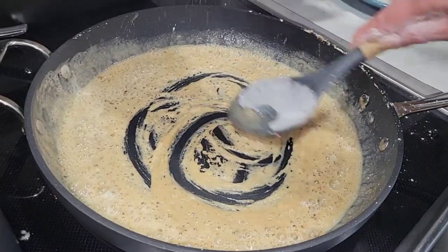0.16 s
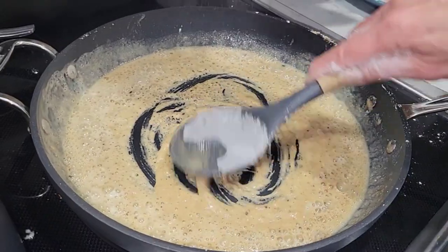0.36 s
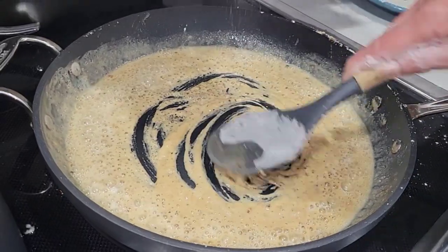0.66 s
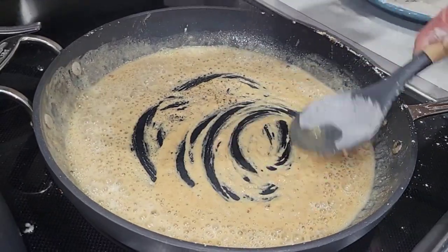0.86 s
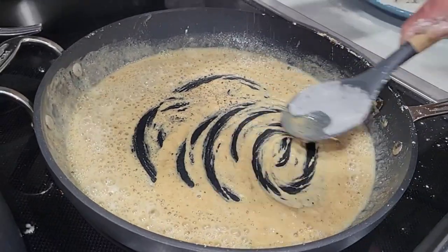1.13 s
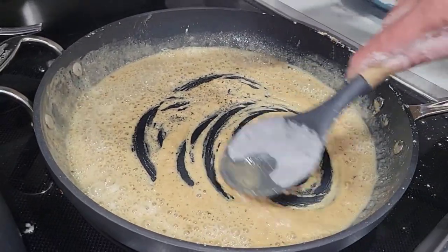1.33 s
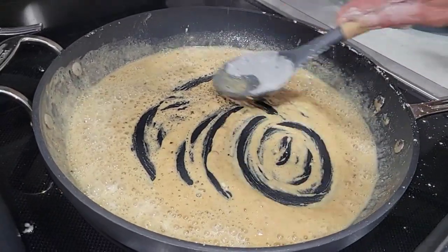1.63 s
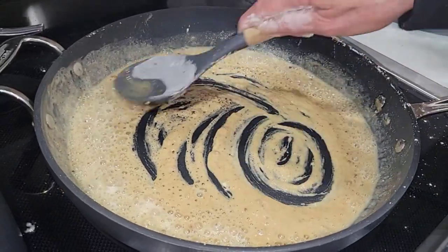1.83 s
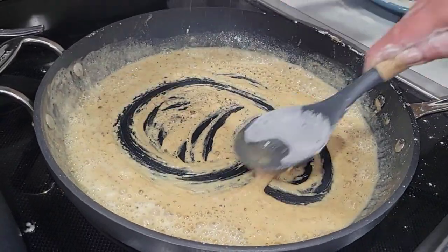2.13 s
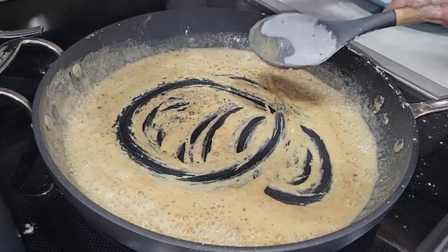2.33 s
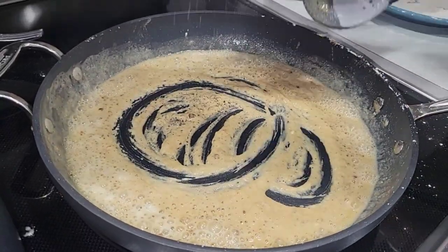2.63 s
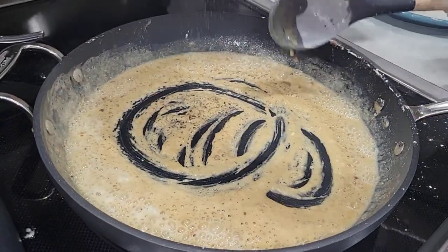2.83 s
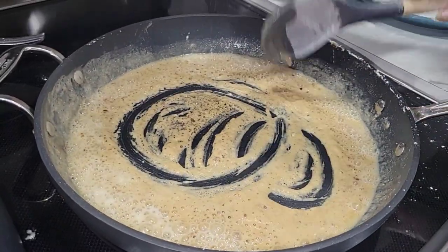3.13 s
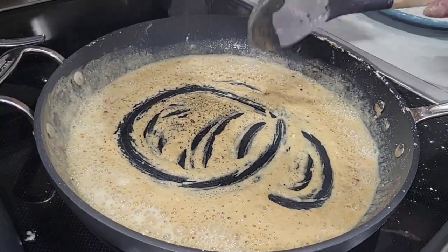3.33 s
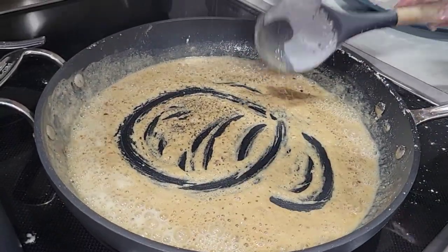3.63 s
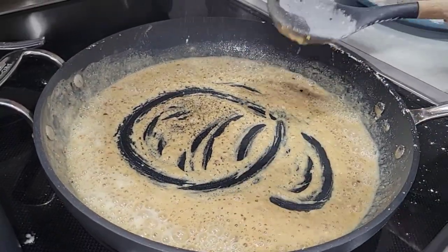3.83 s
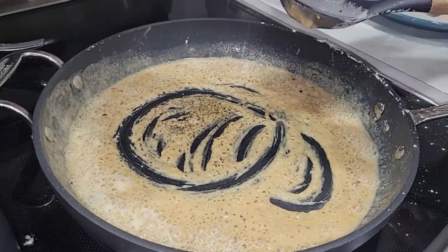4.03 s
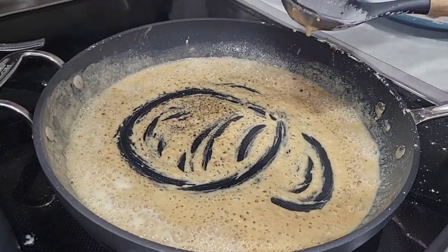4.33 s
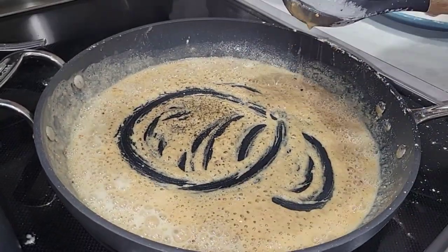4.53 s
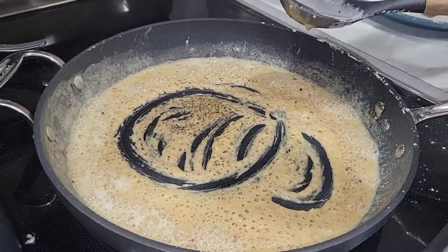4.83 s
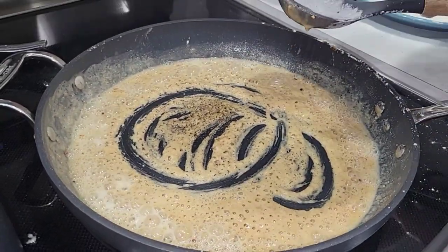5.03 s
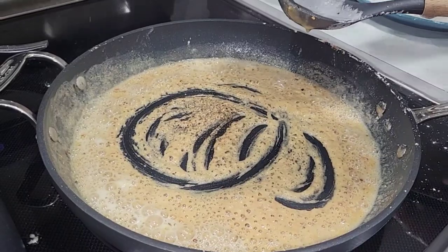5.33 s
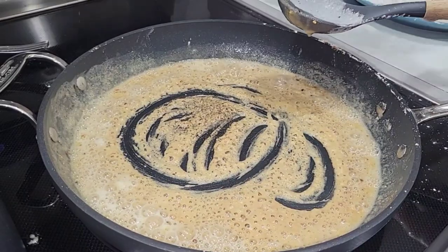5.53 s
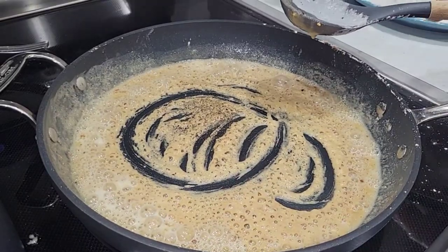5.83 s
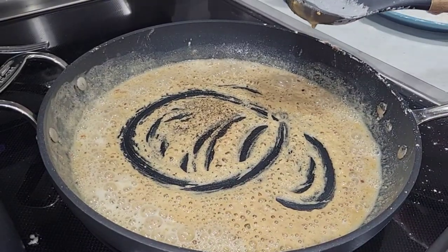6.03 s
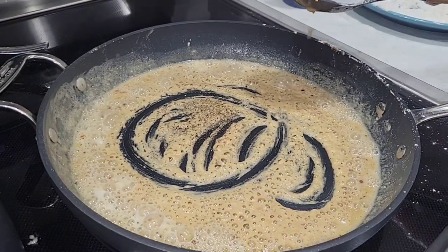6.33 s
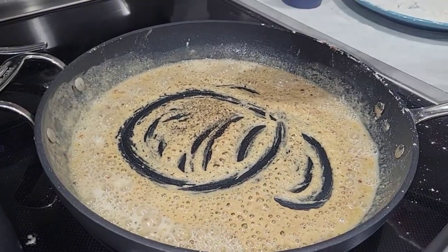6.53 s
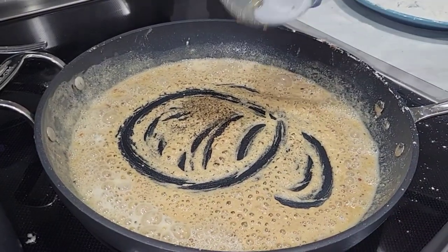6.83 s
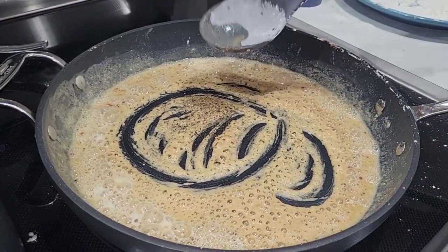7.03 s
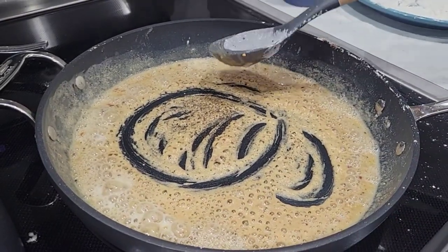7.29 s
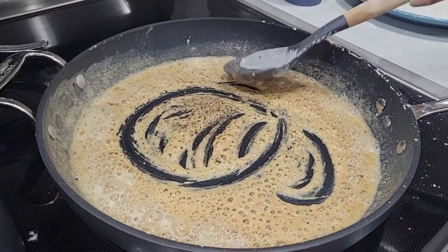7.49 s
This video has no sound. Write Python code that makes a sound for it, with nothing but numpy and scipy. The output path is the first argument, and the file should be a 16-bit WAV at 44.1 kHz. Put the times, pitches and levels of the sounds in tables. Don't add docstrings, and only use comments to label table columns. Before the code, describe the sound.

Close up in a small hard kitchen, a pepper mill grinds in short crunchy strokes about twice a second, corns snapping brightly with faint scraping whispers between. A pan of sauce hisses softly, with dull plops and stirring early on. After about five seconds the grinding stops, leaving low fan hum, fainter simmer and a few small knocks on the counter.

```python
import sys
import numpy as np
from scipy import signal
from scipy.fft import rfft, irfft, next_fast_len
from scipy.io import wavfile
from scipy.ndimage import uniform_filter1d

SR = 44100
rng = np.random.default_rng(int(sys.argv[2]) if len(sys.argv) > 2 else 0)


def natural_amplitude(level_db):
    exponent = np.asarray(level_db, float) / 20
    return 10 ** exponent


def master_out(mix):
    frames = np.transpose(np.atleast_2d(mix))
    ceiling = np.clip(frames, -1, 1)
    pcm = np.round(ceiling * 32767).astype(np.int16)
    wavfile.write(sys.argv[1], SR, pcm)


N = 337666

# frequency in Hz, density in dB per Hz.
AIR_SPECTRUM = [(15, -29), (25, -0.5), (54, -7.5), (101, -8), (118, -20), (209, -15), (241, -12),
                (374, -12.5), (447, -24), (638, -15.5), (726, -23.5), (788, -20.5), (1200, -28),
                (1560, -44), (2640, -120)]
AIR_DB = -62
# frequency in Hz, level in dB, wander in Hz.
FAN_TONES = [
    (47, -61, 0.19),
    (98, -70.5, 0.48),
    (133, -76.5, 0.33),
    (194, -81, 0.9),
]
MAINS_HZ, MAINS_DB, MAINS_OFF_S = 120.3, -63, 5.38
# frequency in Hz, likeness from -1 to 1.
CORRELATION = [(60, 0.52), (180, 0.87), (550, -0.072), (1650, -0.42), (4970, 0.095), (15000, -0.055)]

# time in seconds, hiss level in dB.
SIMMER_VIGOUR = [(0.0, -49), (0.55, -49.5), (1.53, -55), (2.05, -49), (2.13, -55.5), (6.97, -62.5),
                 (7.66, -61.5)]
# frequency in Hz, density in dB per Hz.
HISS_SPECTRUM = [(2350, -24), (4000, -10), (4410, -17), (5360, -2), (5810, -4), (6520, -3.5), (7570, -6.5),
                 (9920, -5), (11300, -10.5), (12800, -3.5), (15800, -9)]
# frequency in Hz, density in dB per Hz.
RUSTLE_SPECTRUM = [(530, -17.5), (900, -8.5), (1350, -2), (1850, -1.5), (2200, -2), (2920, -6), (4500, -7),
                   (5850, -42), (9900, -120)]
RUSTLE_DB, RUSTLE_FOLLOWS = -62, 1.05
PAN_MODES_HZ = (310, 1113)
STIR_DB, STIR_END_S = -61.5, 3.5
# time in seconds, peak in dB, bubble resonance in Hz.
PLOPS = [(0.079, -54, 650), (0.115, -50, 577), (0.181, -55, 630), (0.257, -45, 695), (0.262, -47, 290),
         (0.543, -49.5, 546), (0.588, -51, 610), (0.636, -47, 665), (0.691, -51, 520), (0.719, -52, 620),
         (0.751, -51.5, 640), (1.067, -48.5, 674), (1.42, -55, 650), (1.613, -51, 600), (1.628, -52, 368),
         (2.167, -46, 656), (2.206, -48.5, 590)]

# start in seconds, peak in dB, ring in Hz, t60 in seconds.
KNOCKS = [(5.229, -55, 297, 0.11), (5.23, -55, 770, .095), (5.36, -46, 1220, 0.036),
          (5.361, -43, 2910, 0.04), (5.372, -53, 330, 0.05), (5.477, -51, 2000, 0.2),
          (5.88, -54.5, 615, 0.19), (6.233, -49, 750, .076), (6.258, -38.5, 490, 0.063),
          (6.258, -46, 850, 0.1), (6.259, -41, 3750, 0.13), (6.411, -58, 1300, 0.055),
          (7.529, -50, 1670, .04), (6.309, -57, 306, 0.11), (6.737, -52, 310, 0.07),
          (6.738, -57, 900, 0.15), (6.94, -45, 545, 0.12), (6.942, -53, 2370, 0.16),
          (6.935, -50.5, 3300, 0.052), (6.94, -50, 1360, 0.24), (7.596, -55, 400, 0.08),
          (7.596, -57, 1670, .08), (7.596, -55, 900, .11)]
# start in seconds, peak in dB, ring in Hz,
# t60 in seconds.
BUMPS = [(2.373, -48, 450, 0.044), (2.412, -48, 350, .05), (2.437, -44, 646, .05), (2.96, -51, 260, 0.049),
         (3.386, -45, 403, 0.054), (3.94, -54, 347, 0.036), (4.392, -45, 500, 0.047),
         (4.435, -48, 547, .06)]
KNOCK_WIDTH = 10.5
# start in seconds, peak in dB.
THUDS = [
    (6.258, -42.5),
    (6.312, -53),
    (6.74, -62),
]
# frequency in Hz, level in dB, t60 in seconds.
SLAB_MODES = [(81, 4.5, 0.35), (121, 8, 0.13), (212, 8, 0.22), (263, 10, 0.05), (300, -22, 0.12),
              (616, -20, 0.042), (750, 1, 0.11)]

# middle in seconds, length in
# seconds, frequency in Hz, bandwidth in Hz, level in dB.
SQUEAKS = [(1.448, 0.072, 13000, 700, -51), (5.204, 0.0059, 12600, 2100, -26),
           (5.466, 0.014, 12000, 300, -55), (5.49, 0.05, 12600, 250, -55), (5.503, 0.14, 8300, 790, -59),
           (5.62, 0.17, 8400, 500, -63), (5.709, 0.0091, 13500, 3000, -54),
           (5.365, 0.013, 10000, 6700, -51), (1.388, 0.007, 11000, 6000, -43)]
SQUEAK_PAN_DB = 2.5
# middle in seconds, length in seconds,
# level in dB, favoured band in Hz.
BACK_TURNS = [(0.707, .14, -53, 6550), (1.08, 0.15, -50, 8700), (1.438, 0.16, -51.5, 6900),
              (1.64, 0.25, -59, 6000), (2.167, 0.21, -48.5, 4100), (2.687, 0.11, -50.5, 5700),
              (3.205, .22, -54, 5530), (3.667, 0.2, -52.5, 3200), (4.16, .24, -54, 5570),
              (4.69, 0.23, -53, 5700), (6.532, 0.25, -65, 3500), (6.995, 1, -63.5, 1600),
              (7.287, 0.13, -68, 2300)]
# frequency in Hz, density in dB per Hz.
SLIDE_SPECTRUM = [(700, -47), (1300, 1.5), (2300, 8), (4000, 0), (6000, 1.5), (9000, 4), (13000, 2.5),
                  (16000, 3)]

GRIPS = [0, .3465, .385, .801, .818, .869, 1.251, 1.8158, 1.86, 2.3495, 2.4112, 2.5, 2.88, 2.921, 3.372,
         3.417, 3.8478, 3.9042, 4.3608, 4.404, 4.858, 4.866]
# hold in seconds, level in dB, treble against body in dB.
TWISTS = [(0.0032, -41.5, 0), (0.028, -39.5, 1), (0.1, -35, -3), (.016, -44, 5), (0.028, -33, -0.5),
          (0.054, -34, -3), (0.012, -41, -10), (0.022, -34.5, -2), (.11, -39, -1.5), (.042, -38.5, -3),
          (0.065, -36.5, 0), (0.039, -38.5, -10), (0.043, -46, 1.5), (0.12, -39, -0.5), (0.045, -35.5, 1.5),
          (0.085, -35.5, 1.5), (0.042, -37, -6), (0.056, -36.5, -3), (0.051, -35, -6), (0.053, -38, -3),
          (.006, -44, -1), (0.05, -36, 5)]
RELEASE_DB_PER_S = 600
CRUMB_RINGS_HZ = (2200, 2650, 2800, 3200, 3730)
CRUMB_GAP_S, CRUMB_DECAY_S = .006, .0038
CRUMB_DB, CRUMB_SPREAD_DB = 3, 2

# time in seconds, level in dB, body ring in Hz, length in ms, treble in dB.
CRACKS = [(0.3474, -20.5, 1510, 2.3, -3), (0.432, -18, 3240, 4.9, 2.5), (0.439, -16.5, 3060, 2.4, 7),
          (0.4575, -21, 3600, 6.5, 2), (0.464, -18, 1900, 11, -3), (0.4918, -21, 2100, 6, 8),
          (0.8173, -22, 2600, 7.3, 10), (.869, -19, 2750, 9.5, 4), (0.9163, -21, 2700, 5.9, 1.5),
          (4.3602, -32, 3420, 3.7, 0), (1.8164, -15, 3560, 3.7, 11), (1.8604, -18.5, 4070, 4, 9),
          (1.898, -18, 1450, 2.4, 9.5), (1.927, -16.5, 1540, 2.6, -4), (2.372, -15.5, 3800, 3.1, -5),
          (2.4117, -17, 2110, 4, 1), (2.439, -21, 2700, 2.6, -6), (2.509, -19, 2820, 4.9, -1),
          (2.9477, -17, 2800, 3.3, 15), (3.0357, -22, 2750, 3.6, 5), (3.381, -22, 3100, 2.3, 1),
          (3.437, -20, 2940, 12, 7), (3.461, -17.5, 3020, 2.6, 12), (3.47, -17, 4000, 3.2, 9),
          (3.9044, -22, 3360, 4.5, -1), (3.9402, -15.5, 1700, 4, 5.5), (4.3912, -13.5, 1810, 3.4, 9.5),
          (0.508, -30, 3190, 2.7, 3), (1.928, -24, 2800, 16, -0.5), (4.8948, -21, 3200, 4.5, 0)]
# time in seconds, level in dB, body ring in Hz, treble in dB.
CHIPS = [(0.3554, -25, 3120, 4.5), (0.3945, -29.5, 3380, 8), (0.409, -25, 2200, 2),
         (0.4273, -23.5, 3320, 5.5), (0.476, -25, 3620, 5), (0.8411, -26, 2590, -1),
         (0.8855, -25.5, 2000, 10), (1.8225, -24, 2970, -1), (1.8305, -25, 3500, 5),
         (1.8417, -20.5, 2820, 10), (1.8791, -26.5, 2950, 1), (2.3494, -35, 2800, -7),
         (2.385, -26, 1700, 0), (2.432, -22, 2700, -1), (2.45, -24.5, 2650, -11), (2.4999, -23, 2650, 3),
         (2.521, -27, 2490, 4), (2.9566, -24.5, 2800, 8), (2.9782, -29.5, 3200, 2),
         (3.0213, -31.5, 2800, 4.5), (3.3854, -24.5, 1460, -2), (3.3981, -27.5, 1510, 4),
         (3.4192, -28, 2800, 8), (3.493, -24, 3200, 1), (3.8475, -26, 2270, 1.5), (3.9256, -26, 3200, -8),
         (4.3727, -27, 4100, -2), (4.8755, -23.5, 2350, 3), (4.888, -22, 2000, 0), (4.9068, -21.5, 4400, 0),
         (3.937, -24, 2000, 2)]
# time in seconds, level in dB, body ring in Hz, treble in dB.
CRUMBS = [(0.3881, -35, 2760, 19), (0.4237, -24, 3250, -2), (0.5292, -33, 2050, -19),
          (0.8327, -27, 2650, -7), (0.8485, -24, 2500, 1), (0.888, -25, 3500, 10), (0.8965, -29, 2800, -6),
          (0.9464, -36, 2860, 3), (1.263, -35, 2150, -8), (1.9126, -30, 2800, 6), (1.9443, -30, 3190, -12),
          (1.955, -34.5, 1580, -21), (1.9827, -34, 2800, -18), (2.365, -34, 2800, 2),
          (2.421, -24, 3120, -2), (2.4744, -31, 3230, 4), (2.492, -38, 3170, -2), (2.554, -38.5, 2820, -22),
          (2.8793, -35, 4200, 6), (2.896, -33, 3190, -9), (2.9044, -30, 2920, -4), (2.921, -32, 3180, -6),
          (2.9266, -29.5, 3000, -13), (2.934, -36, 3120, -6), (2.9407, -29, 2800, 15),
          (2.9752, -27, 2900, 4), (2.9893, -27, 3320, 3), (3.014, -33, 2840, -11), (3.0277, -29, 3100, -6),
          (3.0303, -31, 2060, 3), (3.0564, -36.5, 2400, 0), (3.3707, -33, 2970, -2),
          (3.4045, -26, 2200, -10), (3.4895, -27, 2800, 11), (3.498, -22.5, 3000, 8),
          (3.5042, -31, 2800, -14), (3.8584, -27.5, 2800, 9), (3.8793, -33, 3320, -14),
          (3.8835, -29, 2700, -8), (3.893, -24.5, 2730, 3), (3.9806, -33.5, 1820, -5),
          (3.9887, -37, 2760, -6), (4.367, -29, 3570, -10), (4.3832, -29, 3140, 2), (4.388, -29, 2300, 10),
          (4.4078, -32, 2370, -6), (4.411, -29, 2350, 18), (4.4232, -36, 2780, 8), (4.4653, -35, 1790, 9),
          (4.4697, -29, 2330, -9)]
CHIP_MS, CRUMB_MS = 5.5, 2
# time in seconds, level
# in dB, ring in Hz, treble in dB, length in ms.
TICKS = [(0.322, -41.5, 2800, 2, 29), (0.721, -37.5, 1960, 25, 4), (1.035, -39, 2400, 5, 3.4),
         (4.8661, -12, 3730, 2, 3), (1.3866, -50, 2000, -3, 18), (1.797, -41, 2170, 1, 9.9),
         (2.0475, -42.5, 3870, -9, 8.6), (3.264, -49, 4000, 15, 16), (3.526, -29, 2870, 12, 4),
         (3.7898, -53, 2000, -7, 5), (4.4842, -34, 3330, -14, 3.2), (5.1133, -45, 3860, -1, 4.1),
         (5.203, -38, 3960, 32, .8), (6.261, -48, 3850, -4, 12), (4.8664, -15, 6300, -12, 4),
         (6.459, -55, 2450, 15, 70), (6.899, -57, 1900, -4, 14), (6.932, -49.5, 1800, -4, 9),
         (7.37, -56.5, 2200, 2, 6), (7.513, -49, 4430, 9, 5.5), (1.416, -50, 2900, -10, 13),
         (1.185, -51, 2000, -3, 4.5), (.7763, -46.5, 2870, 3, 6), (7.527, -44.5, 2860, 11, 5.9)]
# time in seconds, level in dB,
# body ring in Hz, length in ms.
JOLTS = [(1.2512, -25, 2200, 3), (1.2514, -26, 1570, 3.4), (1.2535, -34, 4000, 14),
         (3.8672, -28, 2480, 6.6), (3.958, -27, 2570, 2.4), (4.4327, -23, 1780, 1.7),
         (4.4395, -24.5, 1730, 6), (4.4496, -27, 1850, 3.5), (4.9145, -26, 2240, 7), (.0015, -38, 3330, 11)]
JOLT_TREBLE_DB = -14
SPLIT_DB = 21.5
BASS_CUT = 0.4
LOW_RING_DB_PER_OCTAVE = 6
TURN_LAG = 10

# frequency in Hz, bandwidth in Hz, level in dB.
MILL_MODES = [(1540, 140, -10.5), (2000, 3300, -5), (2700, 230, -4), (6110, 230, -14.5)]
# frequency in Hz, density in dB per Hz.
MILL_SPECTRUM = [(150, -37), (300, -13.5), (600, -10), (900, -20.5), (1150, -11), (1400, -6.5), (2000, -8),
                 (2800, -9), (4000, -5.5), (5200, -11), (6300, -7), (8000, -8.5), (12500, -9), (16000, -10)]
# time in seconds, left minus right in dB.
SWAY = [(0, -.5), (.7, 0), (1.1, 1.5), (1.6, 2), (2.2, -1.3), (2.7, -1.7), (3.2, -1.1), (3.7, -.2),
        (4.2, 1), (4.7, -2.9), (5.05, 4)]
ROOM_T60_S, ROOM_DB = 0.42, -15.8


def unit(x):
    return x / np.sqrt(np.mean(x ** 2) + 1e-20)


def at_hz(points, hz):
    points_hz, values = np.transpose(points)
    return np.interp(np.log(hz + 1e-3), np.log(points_hz + 1e-3), values)


def colour(x, points):
    size = 4096
    cepstrum = irfft(np.log(natural_amplitude(at_hz(points, np.fft.rfftfreq(size, 1 / SR)))))
    cepstrum[1:size // 2] *= 2
    cepstrum[size // 2 + 1:] = 0
    response = irfft(np.exp(rfft(cepstrum))) + np.zeros(x.shape[:-1] + (1,))
    return signal.fftconvolve(x, response, axes=-1)[..., :N]


def resonance(x, hz, width_hz):
    r = np.exp(-np.pi * width_hz / SR)
    poles = [1, -2 * r * np.cos(2 * np.pi * hz / SR), r * r]
    return signal.lfilter([(1 - r * r) / 2, 0, (r * r - 1) / 2], poles, x)


def butter(x, order, hz, kind):
    return signal.sosfilt(signal.butter(order, hz, kind, fs=SR, output="sos"), x)


def split(x):
    return butter(x, 2, 5000, "low"), butter(x, 3, 5000, "high")


def drift(rate):
    count = int(N / SR * rate) + 2
    return np.interp(np.linspace(0, count - 1, N), np.arange(count), rng.standard_normal(count))


def add(track, piece, s):
    i = max(int(s * SR), 0)
    track[..., i:i + piece.shape[-1]] += piece[..., :N - i]


def stereo_noise(points, patchy_db):
    size = next_fast_len(N)
    mid, side = rfft(colour(rng.standard_normal((2, N)), points), size)
    alike = np.clip(at_hz(CORRELATION, np.fft.rfftfreq(size, 1 / SR)), -1, 1)
    pair = np.sqrt(1 + alike) * mid + np.sqrt(1 - alike) * side * [[1], [-1]]
    return unit(irfft(pair, size)[:, :N]) * natural_amplitude(patchy_db * drift(25))


def drone():
    t = np.arange(N) / SR
    tones = np.zeros(N)
    for hz, db, wander_hz in FAN_TONES:
        phase = 2 * np.pi * np.cumsum(hz + wander_hz * drift(4.7)) / SR
        tones += natural_amplitude(db + 0.5 + 0.23 * drift(5.1)) * np.sin(phase)
    mains_on = np.clip((MAINS_OFF_S - t) / 0.027, 0, 1)
    tones += natural_amplitude(MAINS_DB + 2) * np.sin(2 * np.pi * MAINS_HZ * t) * mains_on
    air = butter(stereo_noise(AIR_SPECTRUM, patchy_db=.8), 3, 42, "high")
    return tones * natural_amplitude([[-.3], [.3]]) + natural_amplitude(AIR_DB) * air


def simmer():
    vigour_db = np.interp(np.arange(N) / SR, *np.transpose(SIMMER_VIGOUR))
    rustle_db = RUSTLE_DB + RUSTLE_FOLLOWS * (vigour_db - vigour_db.mean())
    hiss = natural_amplitude(vigour_db) * stereo_noise(HISS_SPECTRUM, patchy_db=.9)
    return hiss + natural_amplitude(rustle_db) * stereo_noise(RUSTLE_SPECTRUM, patchy_db=.8)


def stirring():
    drag = rng.standard_normal((2, N)) * natural_amplitude(4 * drift(18))
    murmur = unit(resonance(resonance(drag, 674, 200), 620, 300))
    murmur = murmur + 0.55 * unit(resonance(drag, PAN_MODES_HZ[0], 100))
    return natural_amplitude(STIR_DB) * murmur * np.clip(1 - np.arange(N) / SR / STIR_END_S, 0, 1)


def plops():
    out, t = np.zeros(N), np.arange(6000) / SR
    for s, peak_db, hz in PLOPS:
        push = rng.standard_normal(len(t)) * np.exp(-t / 0.009) * np.minimum(t / 0.0017, 1)
        squelch = unit(resonance(resonance(push, hz, 60), hz, 200))
        for pan_hz in PAN_MODES_HZ:
            answer = unit(resonance(resonance(push, pan_hz, 120), pan_hz, 300))
            squelch = squelch + natural_amplitude(-8.5 + 2 * rng.standard_normal()) * answer
        add(out, natural_amplitude(peak_db + 4.0) * squelch / np.abs(squelch).max(), s - .003)
    return out


def knocks():
    out, t = np.zeros(N), np.arange(6000) / SR
    for s, peak_db, hz, t60 in KNOCKS + BUMPS:
        rattle = rng.standard_normal(len(t)) * natural_amplitude(-60 * t / t60)
        knock = resonance(rattle, hz, min(KNOCK_WIDTH * np.sqrt(hz), 400))
        knock = resonance(knock, hz, min(hz, 1100))
        add(out, natural_amplitude(peak_db) * knock / np.abs(knock).max(), s)
    return out


def thuds():
    out, t = np.zeros(N), np.arange(int(.4 * SR)) / SR
    for s, peak_db in THUDS:
        for hz, db, t60 in SLAB_MODES:
            decay = natural_amplitude(peak_db + db - 5 - 60 * t / t60)
            add(out, decay * np.sin(2 * np.pi * hz * t) * np.minimum(t / 0.0032, 1), s)
    return out


def squeaks():
    out = np.zeros((2, N))
    for s, length_s, hz, width_hz, level_db in SQUEAKS:
        rub = resonance(rng.standard_normal((2, 6000)), hz, width_hz)[:, :int(length_s * SR)]
        rub = rub * natural_amplitude([[SQUEAK_PAN_DB], [-SQUEAK_PAN_DB]])
        add(out, natural_amplitude(level_db) * unit(rub) * np.hanning(rub.shape[1]), s - length_s / 2)
    return out


def back_turns():
    out, t = np.zeros((2, N)), np.arange(N) / SR
    slide = stereo_noise(SLIDE_SPECTRUM, patchy_db=1.6)
    for s, length_s, level_db, hz in BACK_TURNS:
        now = np.abs(t - s) < length_s / 2
        rub = slide[:, now] + natural_amplitude(4.5) * resonance(slide[:, now], hz, .2 * hz)
        out[:, now] += natural_amplitude(level_db) * unit(rub) * np.cos(np.pi * (t[now] - s) / length_s)
    return out


def twisting():
    gain, treble_gain = np.zeros(N + SR), np.zeros(N + SR)
    for start, (hold_s, level_db, treble_db) in zip(GRIPS, TWISTS):
        t = np.arange(int((hold_s + .2) * SR)) / SR
        first = int(start * SR)
        now = slice(first, first + len(t))
        after = np.maximum(t - hold_s, 0)
        pressure = np.minimum(t / .0015, 1) * natural_amplitude(level_db - RELEASE_DB_PER_S * after)
        gain[now] = np.maximum(gain[now], pressure)
        treble_gain[now] = natural_amplitude(treble_db - RELEASE_DB_PER_S / 2 * np.minimum(after, .1))
    return gain[:N], treble_gain[:N]


def grit(per_s=6000, spread_db=2.5):
    gain, treble_gain = twisting()
    sizes = natural_amplitude(spread_db * np.minimum(rng.exponential(1, (3, N)), 4)) * rng.choice([-1, 1], (3, N))
    common, left, right = (rng.random((3, N)) < per_s / SR) * sizes
    rub = unit(common + .8 * np.array([left, right])) * gain
    out = rub * natural_amplitude(2 + 3 * drift(150))

    pace, size, pick = rng.random((3, 1500))
    at = (np.cumsum(CRUMB_GAP_S * (.55 + .9 * pace)) * SR).astype(int)
    which_ring = (pick * len(CRUMB_RINGS_HZ)).astype(int)
    for k, hz in enumerate(CRUMB_RINGS_HZ):
        teeth = np.zeros(N)
        mine = (at < N) & (which_ring == k)
        teeth[at[mine]] = natural_amplitude(CRUMB_DB + CRUMB_SPREAD_DB * 3.46 * (size[mine] - .5))
        crushing = signal.lfilter([1], [1, -np.exp(-1 / (CRUMB_DECAY_S * SR))], teeth + 1e-9)
        crumbs = rub * crushing
        out += crumbs + natural_amplitude(6) * resonance(crumbs, hz, 330)
    body, treble = split(out)
    body = butter(body, 1, 1100, "high")
    return natural_amplitude(-1.0) * (body - treble_gain * treble)


def breaks():
    corns = [(s, db, hz, treble_db, ms) for s, db, hz, ms, treble_db in CRACKS]
    corns += [(*chip, CHIP_MS) for chip in CHIPS]
    corns += [(*crumb, CRUMB_MS) for crumb in CRUMBS]
    return corns + TICKS + [(s, db, hz, JOLT_TREBLE_DB, ms) for s, db, hz, ms in JOLTS]


def cracks():
    out, t = np.zeros((2, N)), np.arange(2200) / SR
    for s, level_db, hz, treble_db, length_ms in breaks():
        tau = .85 * max(length_ms, 1) / 1000
        shower = np.exp(-(t / tau) ** 1.1)
        crumbling = natural_amplitude(-16) * np.exp(-t / .008)
        snap = natural_amplitude(-4) * np.exp(-t / .0007)
        shape = (shower + crumbling + snap) * np.minimum(t / .00015, 1)

        common, left, right, spikes = rng.standard_normal((4, len(t)))
        uneven = natural_amplitude(3 * unit(uniform_filter1d(spikes, size=20)))
        burst = (common + np.array([left, right])) * shape * uneven
        burst[:, 1] += natural_amplitude(SPLIT_DB) * np.sign(common[0])

        body, treble = split(burst)
        ring_db = 9 + LOW_RING_DB_PER_OCTAVE * np.log2(max(2800 / hz, 1))
        ringing = natural_amplitude(ring_db) * resonance(burst, hz, max(.08 * hz, 190))
        body = butter(natural_amplitude(min(treble_db, 0) / 2) * body + ringing, 3, BASS_CUT * hz, "high")
        treble[1] = np.roll(treble[1], int(abs(TURN_LAG * right[0])))
        piece = (unit(body) - natural_amplitude(treble_db + 3.5) * unit(treble)) / np.hypot(1, natural_amplitude(treble_db))
        side_db = left[0] * np.array([[1], [-1]])
        loudness = np.sqrt(np.mean(shape ** 2)) * natural_amplitude(level_db + 1.0 + side_db)
        add(out, piece * loudness, s - .0004)
    return out


def mill():
    contact = cracks() + grit()
    ringing = contact.copy()
    for hz, width_hz, db in MILL_MODES:
        ringing += natural_amplitude(min(db, -5)) * resonance(contact, hz, max(width_hz, 420))
    s, sway_db = np.transpose(SWAY)
    sway_db = sway_db[np.searchsorted(s, np.arange(N) / SR, side="right") - 1]
    return natural_amplitude(3.0 + sway_db * [[.5], [-.5]]) * colour(ringing, MILL_SPECTRUM)


def kitchen(x, room_db, low_cut_hz):
    t = np.arange(int(.6 * SR)) / SR
    near = np.zeros((2, len(t)))
    near[:, 0] = 1
    for side, lags in enumerate([(14, 32), (4, 34)]):
        for lag in lags:
            gap = np.zeros(lag - 1)
            near[side] = signal.lfilter(np.r_[-.45, gap, 1], np.r_[1, gap, -.45], near[side])
    tail = rng.standard_normal((2, len(t))) * natural_amplitude(-60 * t / ROOM_T60_S) * np.minimum(t / 0.0089, 1)
    tail = signal.lfilter([.6], [1, -.4], tail)
    tail = butter(tail, 1, low_cut_hz, "high")
    tail /= np.linalg.norm(tail, axis=1, keepdims=True)
    return signal.fftconvolve(x, near + natural_amplitude(room_db) * tail, axes=1)[:, :N]


def scene():
    background = drone() + simmer() + stirring() + squeaks() + back_turns()
    small_things = (plops() + knocks() + thuds()) * np.ones((2, 1))
    near = kitchen(small_things, room_db=-6, low_cut_hz=900)
    near = near + kitchen(mill(), ROOM_DB, low_cut_hz=1900)
    return background + near


def band_limit(x):
    return signal.sosfilt(signal.butter(12, 16990, fs=SR, output="sos"), x)


def record(dry):
    rounded = 1.2 * np.tanh(dry / 1.2)
    low_pass = signal.cheby2(10, 16, 16150, fs=SR, output="sos")
    finished = signal.sosfiltfilt(low_pass, rounded)
    return band_limit(finished)


dry = scene()
out = record(dry)
master_out(out)
```